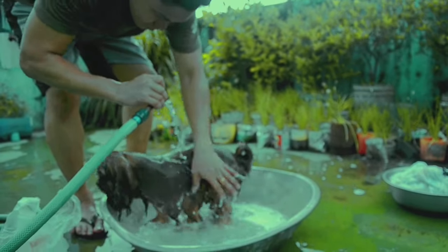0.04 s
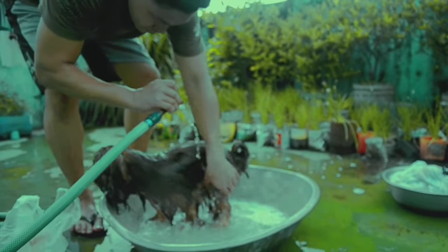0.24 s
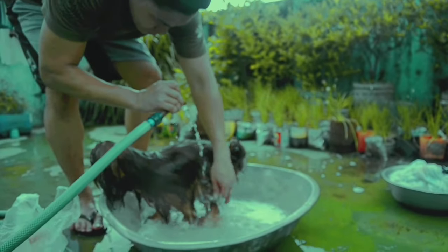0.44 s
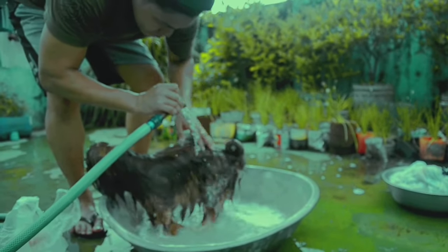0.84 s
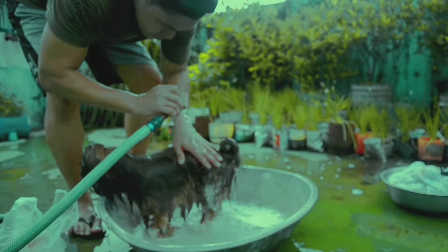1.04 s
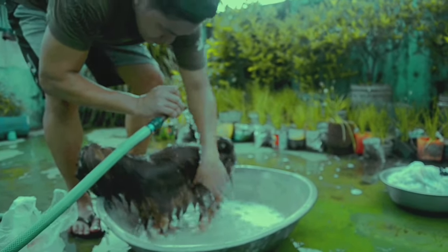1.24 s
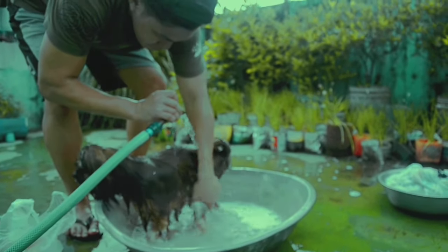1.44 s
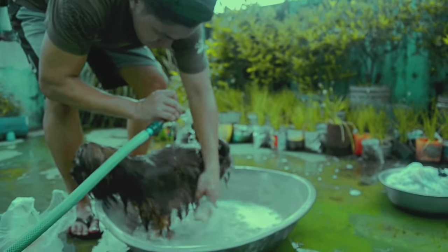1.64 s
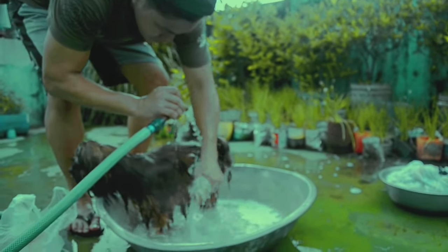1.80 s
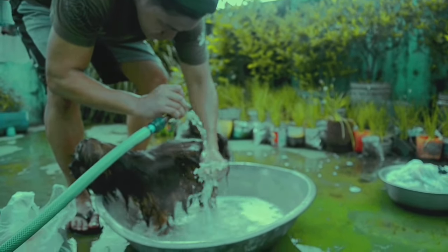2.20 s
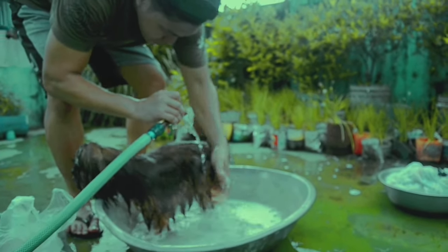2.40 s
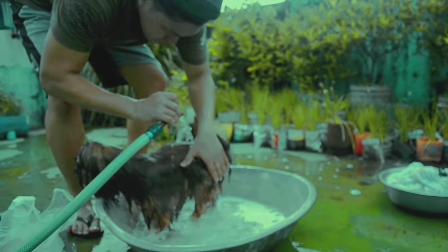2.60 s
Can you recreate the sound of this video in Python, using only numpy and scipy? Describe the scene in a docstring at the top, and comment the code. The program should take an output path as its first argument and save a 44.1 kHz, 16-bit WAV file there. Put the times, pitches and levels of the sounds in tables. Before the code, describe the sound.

Water splashes close by, running from a hose over a dog into a shallow metal basin in a yard. It starts softly and fills out by 0.4 seconds, with slapping drops, plinking bubbles and fine spray over the basin's faint low drumming. From about 1.9 to 2.4 seconds it gushes louder into the pool with sharp drop ticks and a deep gurgle, then fades away by 2.7 seconds.

```python
"""Water splashes into a shallow pool, close by in a yard: a hose runs over a dog in a metal basin.
Falling off the coat, drops slap, trapped bubbles ring and fine spray ticks, while underneath
the basin floor drums and hums softly. Near the end the stream gushes straight into the pool,
then the coat catches it again. One microphone hears it all, with the yard's short reflections."""
import sys
import numpy as np
from scipy import signal
from scipy.io import wavfile

SR = 44100
rng = np.random.default_rng(int(sys.argv[2]) if len(sys.argv) > 2 else 0)


def wav_record(signal):
    """Record a signal, one row per channel, as 16-bit PCM in the file named by sys.argv[1]."""
    frames = np.transpose(np.atleast_2d(signal))
    bounded = np.clip(frames, -1, 1)
    # unit amplitude maps onto the largest positive 16-bit level
    quanta = np.round(bounded * 32767).astype(np.int16)
    wavfile.write(sys.argv[1], SR, quanta)


N = 121275
BUBBLE_RISE_S, TREBLE_EDGE_HZ = 0.003025, 6900


def amp(db):
    return 10 ** (np.asarray(db) / 20)


def unit(x):
    return x / np.sqrt(np.mean(x ** 2) + 1e-20)


def level(curve):
    """Gain over time from rows of seconds and dB."""
    return amp(np.interp(np.arange(N) / SR, *np.transpose(curve)))


def add(mix, start_s, sound):
    part = mix[max(round(start_s * SR), 0):][:len(sound)]
    part += sound[:len(part)]


def wander(per_s):
    """A smooth random drift of rms 1."""
    return unit(signal.resample(rng.standard_normal(int(per_s * N / SR) + 2), N))


def colour(x, points, size=4096):
    """Minimum-phase filter through rows of Hz and dB; the result has rms 1."""
    hz, db = np.transpose(points)
    bin_hz = abs(np.fft.fftfreq(size, 1 / SR))
    log_gain = np.log(amp(np.interp(np.log(bin_hz + 1), np.log(hz), db)))
    kernel = np.fft.ifft(np.exp(np.conj(signal.hilbert(log_gain)))).real
    return unit(signal.fftconvolve(x, kernel)[:N])


def drops(per_s, spread_db):
    """Random impulses of either sign: many small, a few large."""
    size = amp(spread_db * np.minimum(rng.exponential(1, N), 4))
    return size * rng.choice([-1, 1], N) * (rng.random(N) < per_s / SR)


def ring(x, hz, t60):
    """One decaying mode driven by x, at rms 1."""
    pole = np.exp((2j * np.pi * hz - np.log(1000) / t60) / SR)
    return unit(signal.lfilter([1], [1, -pole], x).imag)


def bubble(hz, t60, glide=0.031):
    """A trapped bubble rings, rising in pitch as it nears the surface."""
    t = np.arange(int(t60 * SR) + 2) / SR
    swell = np.sin(np.pi / 2 * np.minimum(t / BUBBLE_RISE_S, 1)) ** 2
    fade = np.exp(-np.log(1000) * np.maximum(t - BUBBLE_RISE_S, 0) / t60)
    pitch = hz * (1 + glide * t / t60)
    return swell * fade * np.sin(2 * np.pi * np.cumsum(pitch) / SR)


def froth(lo_hz, hi_hz, cycles, per_s, spread_db, sizes=128, life_octaves=0.66):
    """A crowd of bubbles of many sizes, each ringing for some tens of cycles."""
    births = drops(per_s, spread_db)
    size_index = rng.integers(0, sizes, N)
    lives = cycles * 2 ** (life_octaves * rng.uniform(-1.1, 1, sizes))
    rings = [bubble(hz, life / hz) for hz, life in zip(np.linspace(lo_hz, hi_hz, sizes), lives)]
    out = np.zeros(N)
    for i in np.flatnonzero(births):
        add(out, i / SR, births[i] * rings[size_index[i]])
    return out


def yard(x, t60=0.12):
    """Short scattered reflections reach the microphone from basin wall, ground and fence."""
    t = np.arange(SR // 2) / SR
    taps = rng.standard_normal(len(t)) * (rng.random(len(t)) < .05) * (t > .002)
    taps *= np.exp(-np.log(1000) * t / t60)
    return signal.fftconvolve(x, taps / np.linalg.norm(taps))[:N]


def floor_hum(tones_hz=(59, 120.1), waver=0.011, flutter_db=2.5):
    """The steady stream holds the basin floor in two low, slightly wavering tones."""
    # Each row: time in seconds, relative levels of the lower and the upper tone in dB.
    loudness = [(0, -97, -90), (.25, -86.5, -75), (.42, -68.5, -61), (.58, -53, -51), (.72, -62, -48),
                (.85, -46, -55.5), (1.05, -57, -52.5), (1.28, -50, -51), (1.4, -57.5, -63),
                (1.52, -69, -56), (1.75, -63, -59), (1.95, -52.5, -49.5), (2.08, -58.5, -59),
                (2.24, -59.5, -47), (2.34, -74, -49.5), (2.55, -81, -85), (2.75, -95, -81)]
    times, *levels = np.transpose(loudness)
    out = np.zeros(N)
    for hz, db in zip(tones_hz, levels):
        pitch = hz * (1 + waver * wander(16))
        tone = np.sqrt(2) * np.sin(2 * np.pi * np.cumsum(pitch) / SR)
        out += tone * level(np.transpose([times, db])) * amp(-0.5 + flutter_db * wander(12))
    return out


def floor_drumming():
    """The stream patters on the water-loaded metal floor and keeps its low modes going."""
    # Each row: time in seconds, level of the drumming in dB.
    loudness = [(0, -84), (.12, -73), (.25, -63.5), (.4, -48.5), (.7, -50), (1.0, -50.5), (1.28, -45.5),
                (1.45, -51), (1.62, -57), (1.93, -49), (2.03, -56.5), (2.18, -44.5), (2.33, -47),
                (2.45, -57), (2.56, -83), (2.75, -79)]
    # Each row: a basin mode's frequency in Hz, relative level in dB, time to fall 60 dB in seconds.
    basin_modes = [(99.4, -5.5, 0.98), (120.7, -17, .5), (174.5, -15, 0.39), (291.8, -16.5, 1)]
    # Each row: frequency in Hz, relative gain of the thuds in dB.
    thud_colour = [(20, -39), (45, -22.5), (75, -9.5), (100, -4), (145, 1), (190, -13.5), (260, -22.5),
                   (700, -35)]
    patter = drops(per_s=400, spread_db=2.0)
    ringing = sum(amp(db) * ring(patter, hz, t60) for hz, db, t60 in basin_modes)
    return level(loudness) * (amp(-4) * ringing + amp(-6.5) * colour(patter, thud_colour))


def coat():
    """Water lands on soaked fur with soft thuds."""
    # Each row: time in seconds, relative level of the patter in dB.
    loudness = [(0.0, -76), (0.13, -84.5), (0.24, -61.5), (0.37, -52.5), (0.62, -70), (0.88, -55.5),
                (1.1, -67), (1.39, -54.5), (1.56, -72.5), (1.92, -58.5), (1.99, -61.5), (2.31, -52),
                (2.59, -77.5), (2.75, -87)]
    # Each row: frequency in Hz, relative gain of the wet fur's dull tone in dB.
    fur_colour = [(100, -23.5), (200, -3.5), (255, -3), (305, 5), (360, -4.5), (430, -8), (700, -15.5),
                  (2000, -51.5)]
    return level(loudness) * amp(-1) * colour(drops(per_s=1200, spread_db=2.5), fur_colour)


def rising_bubble(waver=0.0047, flutter_db=2):
    """A single large bubble rings on as one fluttering note after the gush, bending upward as it rises."""
    # Each row: time in seconds, the note's pitch in Hz, level in dB.
    course = [(2.25, 863, -54), (2.309, 895, -32), (2.369, 918, -41), (2.42, 921, -37), (2.47, 933, -43.5),
              (2.51, 940, -69)]
    times, hz, db = np.transpose(course)
    t = np.arange(N) / SR
    pitch = np.interp(t, times, hz) * (1 + waver * wander(100))
    tone = np.sqrt(2) * np.sin(2 * np.pi * np.cumsum(pitch) / SR)
    gain = amp(np.interp(t, times, db) + flutter_db * wander(91))
    return tone * gain * (t > times[0]) * (t < times[-1])


def spurts(step_octaves=0.41):
    """Sheets of water thrown off the hand and coat break up into quick swells of droplets."""
    # Each row: loudest moment in seconds, half-length in seconds, level in dB, centre in Hz.
    sheets = [(0.535, 0.023, -50.5, 3950), (0.777, 0.0084, -52, 4470), (1.033, 0.016, -51.5, 3220),
              (1.14, 0.012, -46, 2980), (1.488, .035, -53, 3620), (2.22, .01, -41.5, 3700),
              (2.464, 0.011, -43, 3350)]
    t, out = np.arange(N) / SR, np.zeros(N)
    for peak_s, half_s, db, hz in sheets:
        band = [(hz * 2 ** (k * step_octaves), -5 * k * k) for k in range(-3, 4)]
        swell = np.exp(-((t - peak_s) / half_s) ** 2 / 2)
        out += amp(db) * swell * colour(drops(per_s=4900, spread_db=3.5), band)
    return out


def spray():
    """Fine droplets tick and tiny bubbles fizz."""
    # Each row: time in seconds, level of the spray in dB.
    loudness = [(0, -63), (.1, -59.5), (.35, -45.5), (.46, -49.5), (.53, -42), (.63, -50), (.79, -46.5),
                (.87, -47.5), (1.01, -47.5), (1.08, -53), (1.14, -46.5), (1.22, -48), (1.38, -46),
                (1.5, -47.5), (1.63, -51.5), (1.85, -44), (2.05, -39.5), (2.23, -39.5), (2.43, -48.5),
                (2.54, -54.5), (2.75, -68.5)]
    # Each row: frequency in Hz, relative gain in dB of the spray as heard through the microphone,
    # whose colour dips near 4100, 5100 and 5900 Hz.
    through_mic = [(1200, -18.5), (2400, -0.5), (3000, 11), (3400, -4.5), (3780, 2.5), (4080, -8),
                   (4500, 3.5), (4820, 2), (5110, -4.5), (5350, 2), (5720, -1.5), (5900, -10), (6150, -3.5),
                   (6600, -6.5), (7000, -25)]
    ticking = colour(drops(per_s=4900, spread_db=3.5), through_mic)
    fizz = colour(froth(2400, 7026, cycles=71, per_s=1700, spread_db=7.5), through_mic)
    return level(loudness) * (amp(-2) * ticking + amp(-7.5) * fizz)


def gurgle():
    """Heavy gouts of water make large, deep bubbles and set the basin's rim ringing."""
    # Each row: time in seconds, level of the gurgle in dB.
    loudness = [(0, -61.5), (.1, -59.5), (.24, -51), (.37, -37.5), (.47, -45.5), (.58, -51), (.65, -43.5),
                (.76, -46), (.88, -42.5), (.99, -41.5), (1.08, -44), (1.2, -44), (1.33, -40.5),
                (1.44, -43.5), (1.52, -50), (1.7, -50.5), (1.82, -43), (1.97, -39.5), (2.12, -35),
                (2.2, -37), (2.28, -29), (2.42, -43), (2.52, -51), (2.75, -63)]
    # Each row: frequency in Hz, relative gain of the deep bubbles in dB.
    deep_colour = [(150, -50.5), (430, -35.5), (520, -13.5), (600, 0), (800, 6), (970, 5), (1100, -9),
                   (1600, -37.5)]
    deep = colour(froth(443, 1137, cycles=29, per_s=700, spread_db=0.5), deep_colour)
    rim = ring(drops(per_s=700, spread_db=0.5), hz=595.6, t60=0.57)
    return level(loudness) * (amp(-1.5) * deep + amp(-13) * rim)


def drop_ticks(rise_s=0.0001, decay_s=0.0011, grit=0.41):
    """Hard drop impacts cut through the splashing as sharp, gritty ticks."""
    # Each row: start in seconds, centre in Hz, peak level in dB.
    impacts = [(.013, 2980, -37), (0.129, 5800, -44), (.176, 6020, -44.5), (0.423, 5800, -33),
               (.69, 6300, -41), (0.769, 4500, -31.5), (0.788, 4700, -34.5), (.897, 6350, -37.5),
               (1.35, 6370, -31), (1.399, 5500, -30), (1.962, 2890, -24), (2.0371, 3020, -11.5),
               (2.0377, 4790, -18.5), (2.092, 5900, -24.5), (2.23, 4000, -35), (2.294, 5500, -25.5),
               (2.33, 3560, -25.5)]
    t, out = np.arange(SR // 100) / SR, np.zeros(N)
    for start_s, hz, db in impacts:
        tick = np.sin(2 * np.pi * hz * t) + grit * rng.standard_normal(len(t))
        tick *= (1 - np.exp(-t / rise_s)) * np.exp(-t / decay_s)
        band = signal.butter(2, [hz / 2.6, min(hz * 2, TREBLE_EDGE_HZ)], "band", fs=SR, output="sos")
        tick = signal.sosfilt(band, tick)
        add(out, start_s, amp(db) * tick / abs(tick).max())
    return out


def plinks():
    """Single bubbles ring clear above the splashing."""
    # Each row: time near the peak in seconds, pitch in Hz, relative level in dB, ring time in seconds.
    clear_bubbles = [(.327, 1750, -18.5, 0.028), (0.362, 1770, -20, 0.022), (.388, 1834, -27.5, .02),
                     (.415, 1913, -28, 0.027), (.464, 2126, -19.5, 0.021), (0.496, 1530, -28.5, 0.03),
                     (0.641, 1960, -27.5, 0.031), (0.697, 1658, -23.5, .03), (0.836, 1686, -20, 0.037),
                     (0.877, 1205, -17.5, 0.043), (0.902, 1885, -26, 0.028), (.934, 1180, -22.5, 0.037),
                     (0.95, 1164, -22, .04), (.995, 775, -28, 0.051), (1.016, 2740, -22.5, 0.018),
                     (1.05, 1700, -20, 0.026), (1.292, 2225, -24, 0.019), (1.322, 1213, -19, 0.038),
                     (1.347, 1760, -18.5, 0.027), (1.385, 1634, -20, 0.031), (1.418, 1092, -14.5, 0.03),
                     (1.531, 1700, -26.5, 0.049), (1.591, 1576, -23.5, 0.018), (1.702, 1710, -21, 0.043),
                     (1.821, 1530, -23, 0.033), (1.877, 1890, -21.5, 0.019), (1.885, 1545, -23.5, 0.034),
                     (1.961, 1246, -18.5, 0.019), (2.042, 723, -24, 0.041), (2.095, 1113, -11, 0.053),
                     (2.095, 4780, -23.5, 0.025), (2.144, 1213, -14.5, 0.044), (2.176, 1910, -15.5, 0.019),
                     (2.222, 2940, -21.5, 0.023), (2.245, 1120, -19, .035), (2.265, 1365, -15.5, 0.026),
                     (2.274, 803, -28, 0.056), (2.3, 1457, -11.5, 0.031), (2.505, 1750, -26, 0.036),
                     (2.616, 1700, -29, 0.026)]
    out = np.zeros(N)
    for time_s, hz, db, t60 in clear_bubbles:
        start_s = time_s - BUBBLE_RISE_S - t60 / 20
        add(out, start_s, amp(db - 3) * bubble(hz, t60))
    return out


def pour():
    """Falling water slaps the pool and traps bubbles."""
    # Each row: time in seconds, level of the falling water in dB.
    loudness = [(0, -45.5), (.05, -51), (.2, -40), (.37, -32.5), (.46, -33), (.57, -35.5), (.66, -33.5),
                (.74, -34.5), (.88, -33), (1.03, -34.5), (1.12, -36.5), (1.22, -35), (1.33, -33.5),
                (1.43, -33), (1.49, -35), (1.66, -38), (1.8, -32), (1.95, -30), (2.1, -24.5), (2.2, -27),
                (2.29, -26.5), (2.42, -34), (2.56, -42.5), (2.75, -51.5)]
    # Each row: frequency in Hz, relative gain of the splashing in dB.
    pool_colour = [(300, -56.5), (560, -40), (720, -22), (850, -13.5), (1020, -14.5), (1110, -2), (1220, 0),
                   (1320, -6), (1750, -1.5), (1920, -3.5), (2120, -10.5), (2320, -13), (2700, -12),
                   (3050, -19), (3400, -21.5), (4100, -47.5), (7000, -61.5)]
    bubbles = colour(froth(939.7, 3306, cycles=35, per_s=1400, spread_db=3), pool_colour)
    slaps = colour(drops(per_s=2500, spread_db=4.0), pool_colour)
    return level(loudness) * (amp(-2) * bubbles + amp(-4) * slaps)


def scene():
    """At the microphone, in mono: splashing and its reflections over the softer coat and basin."""
    water = pour() + gurgle() + spray() + spurts() + plinks() + drop_ticks()
    reflections = amp(-11) * yard(water)
    return (water + reflections + coat() + floor_drumming() + floor_hum() + rising_bubble())[None]


def record(dry):
    """The recorder cuts off the high treble steeply."""
    lowpass = signal.firwin(401, TREBLE_EDGE_HZ, window=("kaiser", 8), fs=SR)
    return signal.oaconvolve(dry, lowpass[None], "same")


dry = scene()
out = record(dry)
wav_record(out)
```